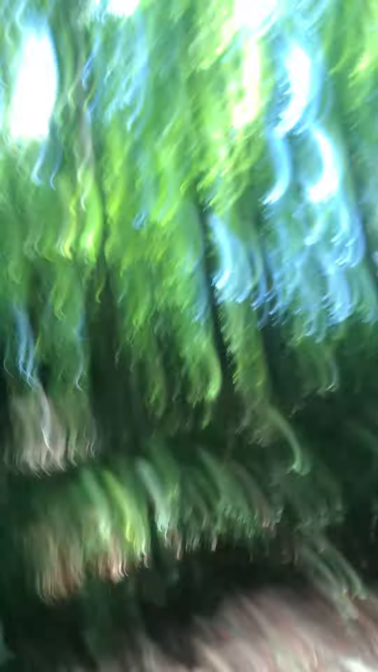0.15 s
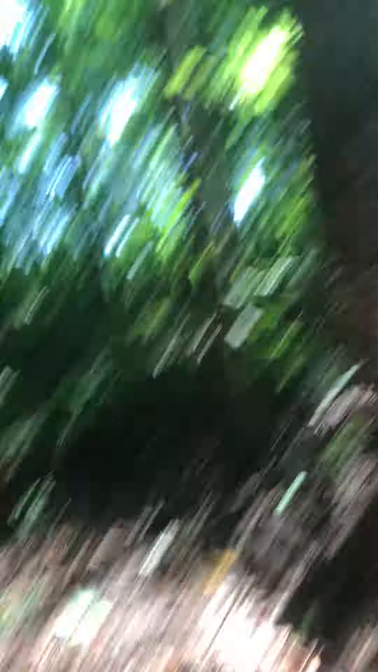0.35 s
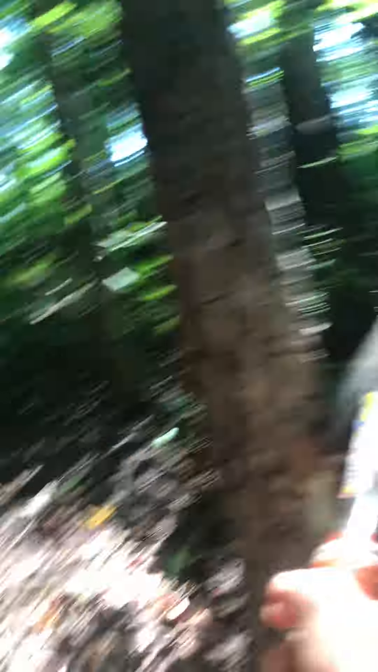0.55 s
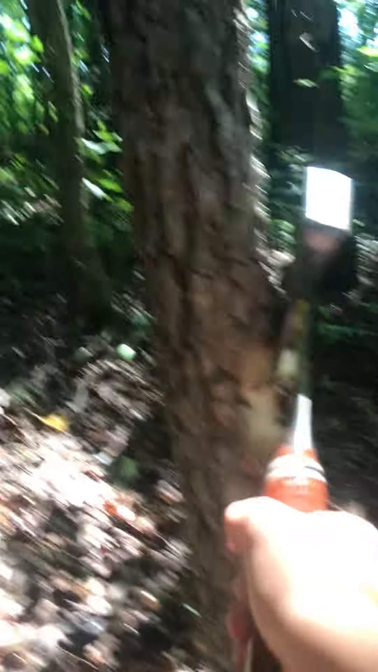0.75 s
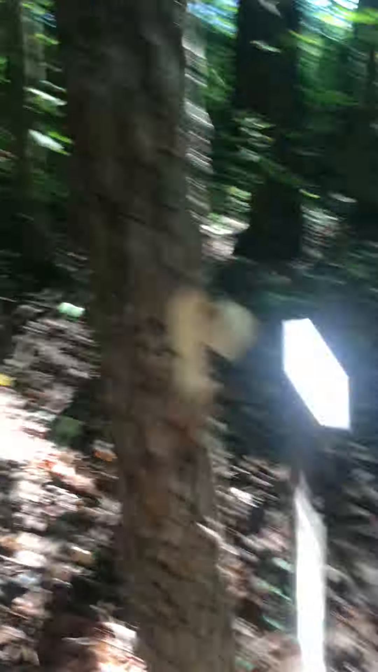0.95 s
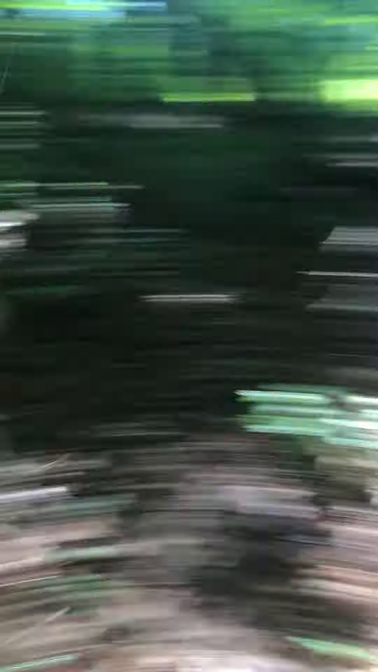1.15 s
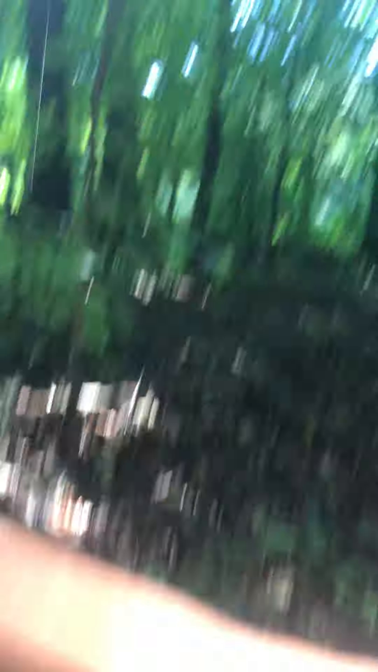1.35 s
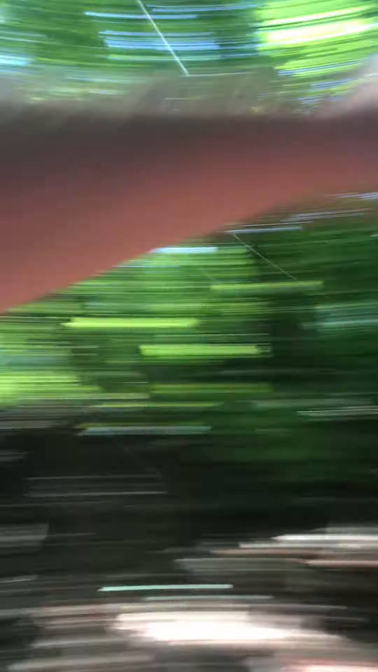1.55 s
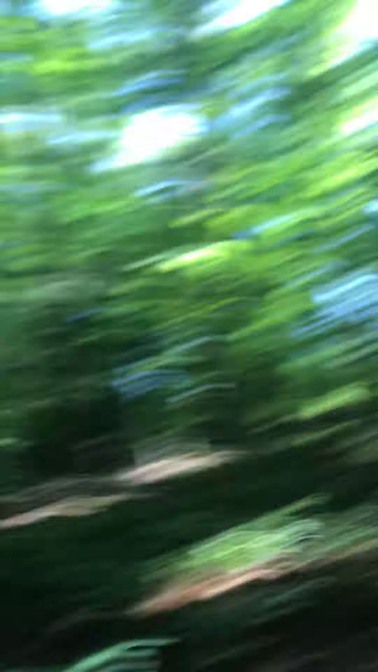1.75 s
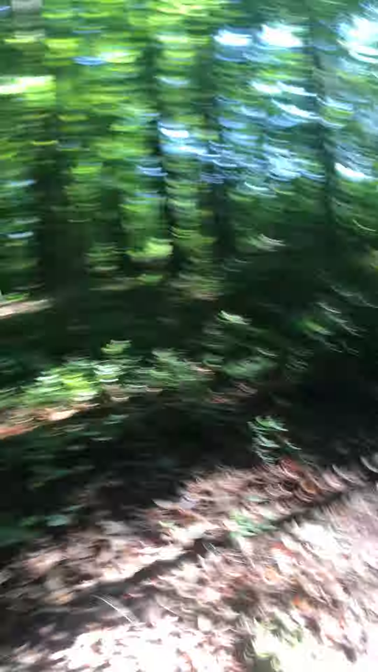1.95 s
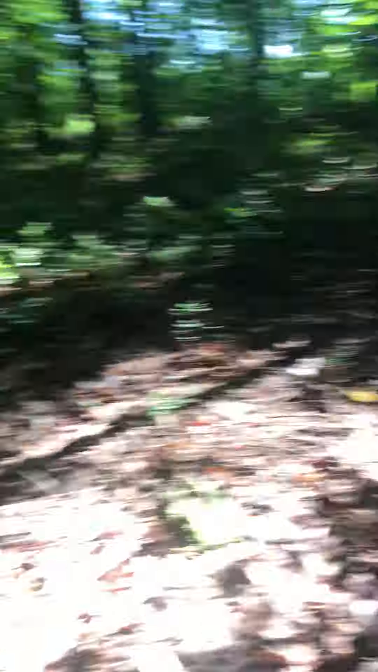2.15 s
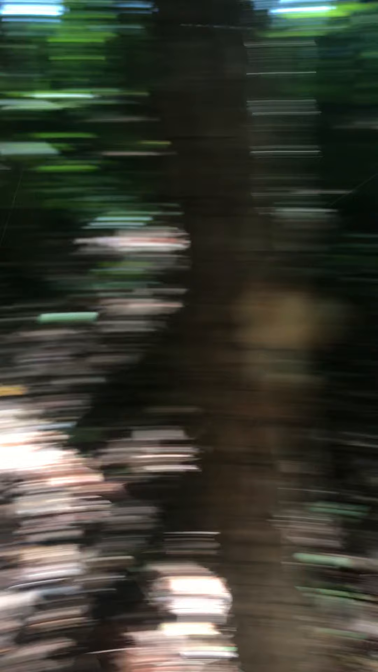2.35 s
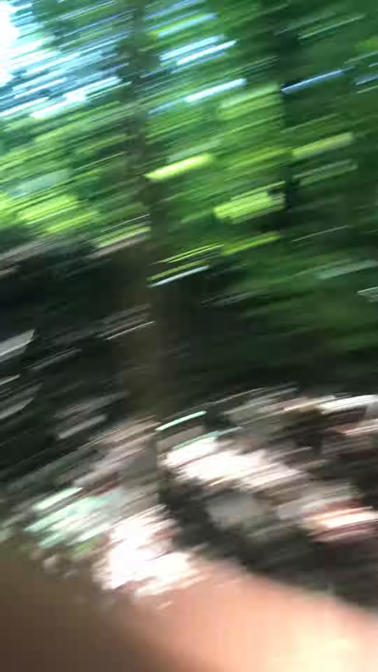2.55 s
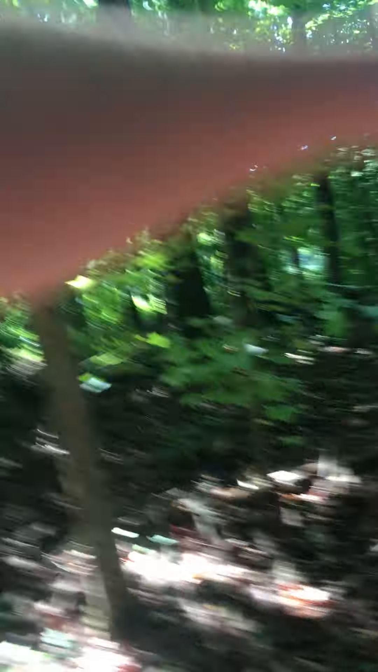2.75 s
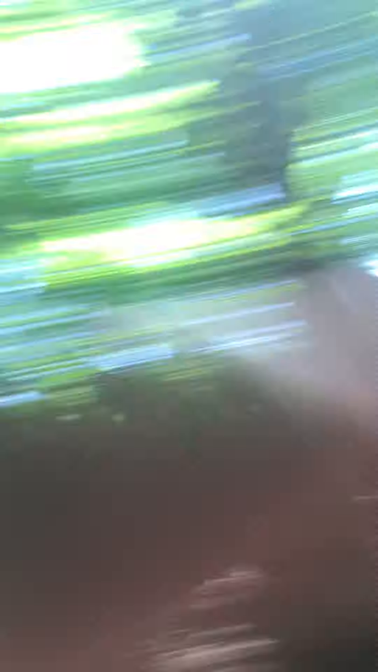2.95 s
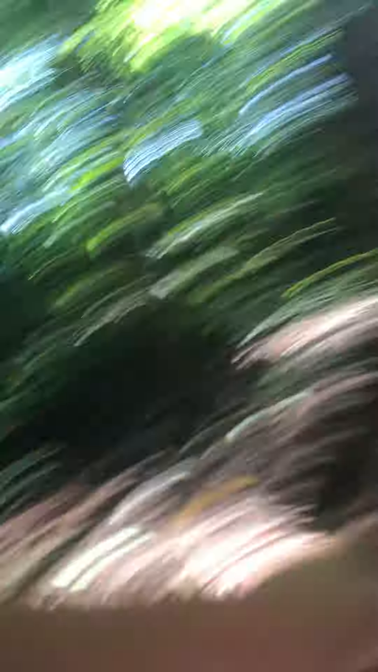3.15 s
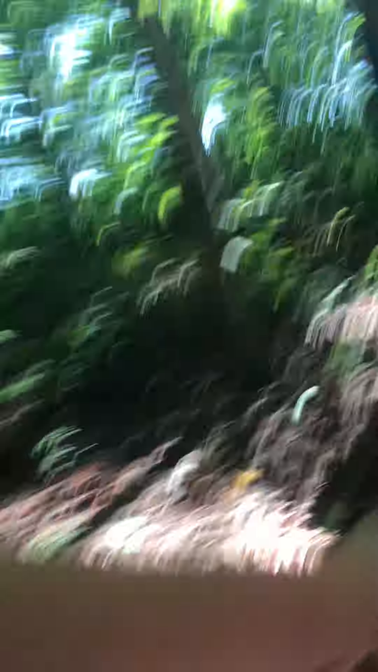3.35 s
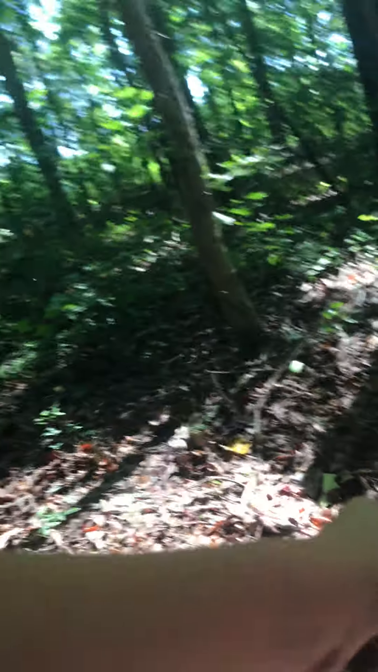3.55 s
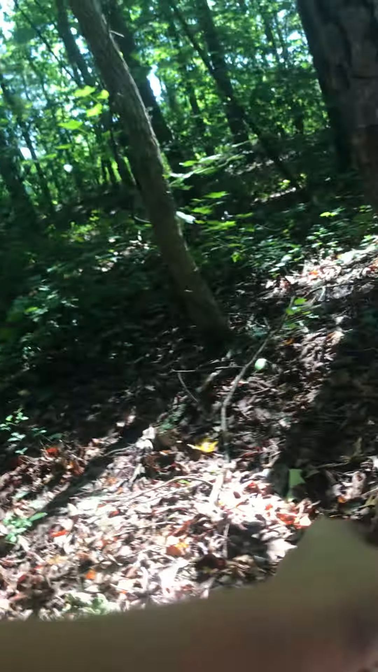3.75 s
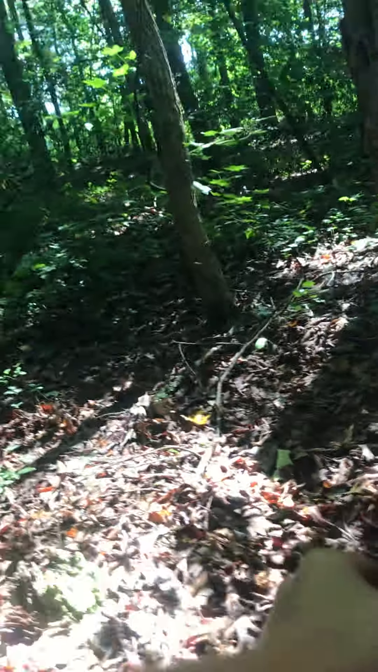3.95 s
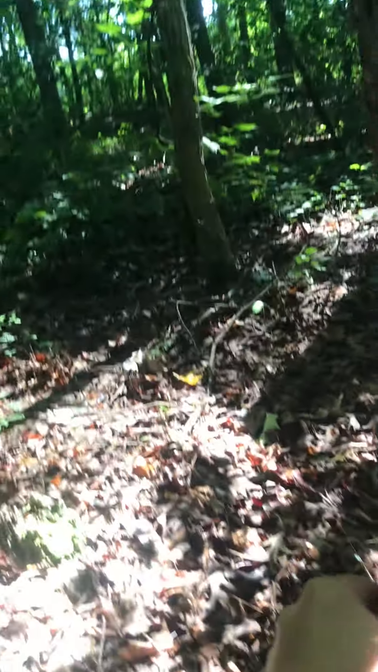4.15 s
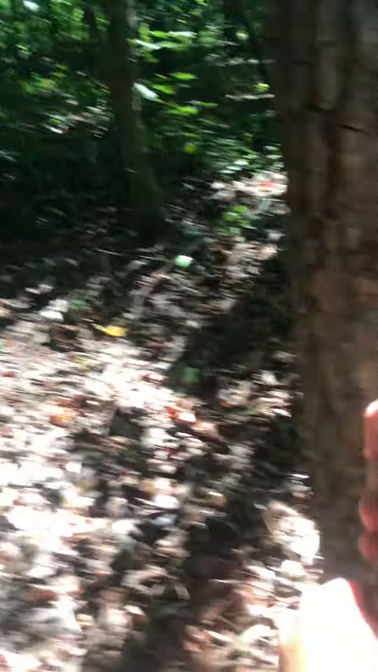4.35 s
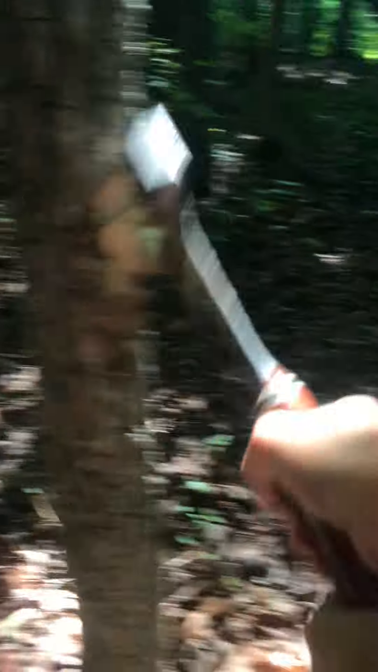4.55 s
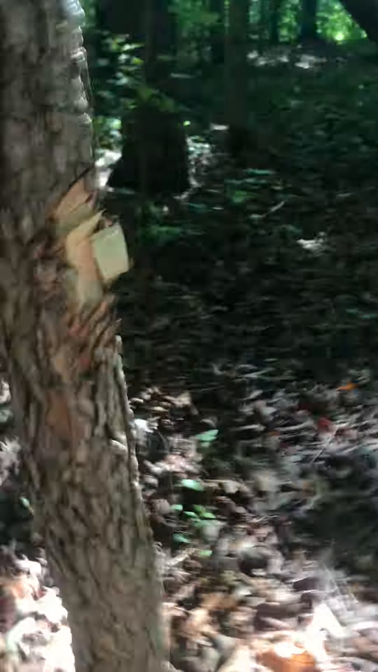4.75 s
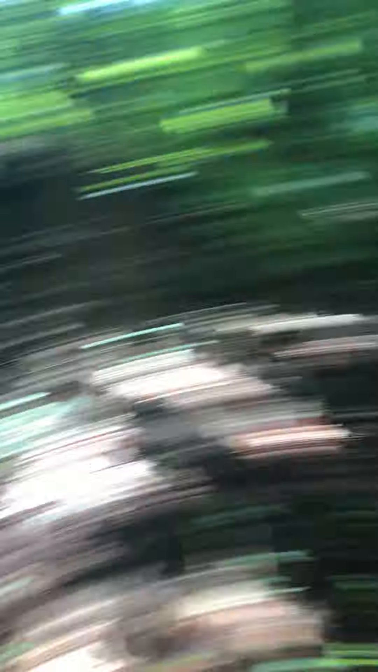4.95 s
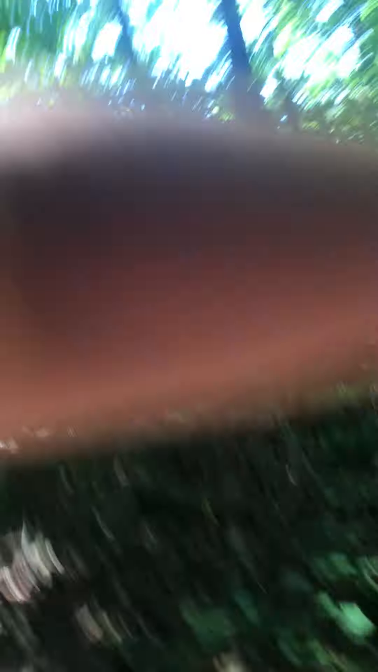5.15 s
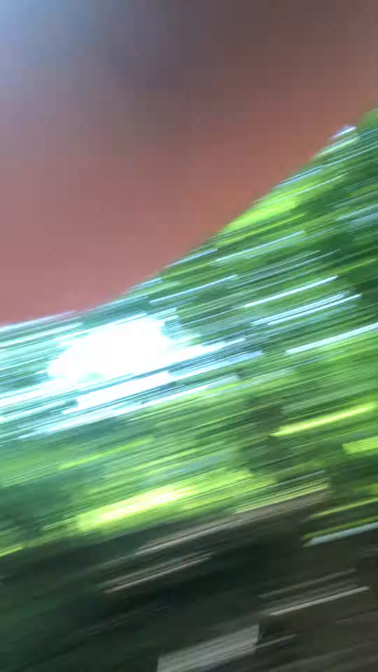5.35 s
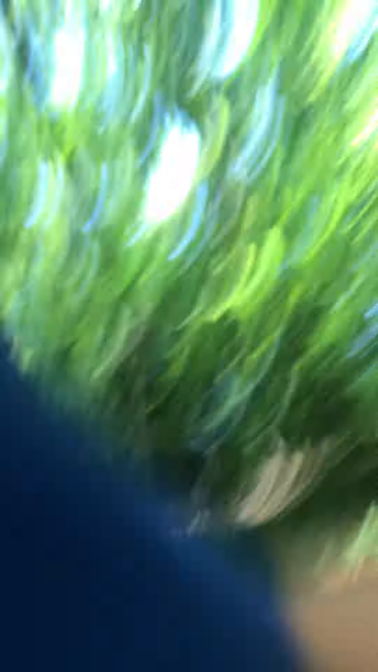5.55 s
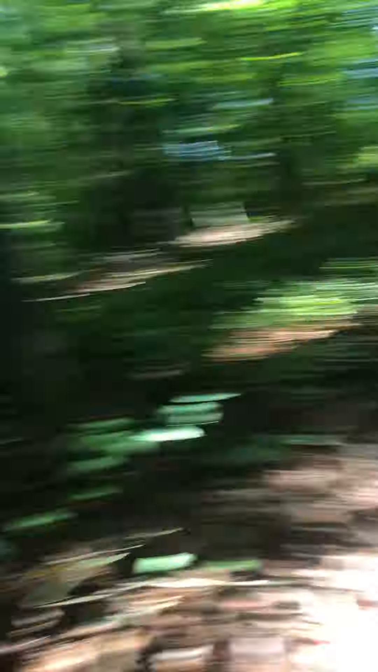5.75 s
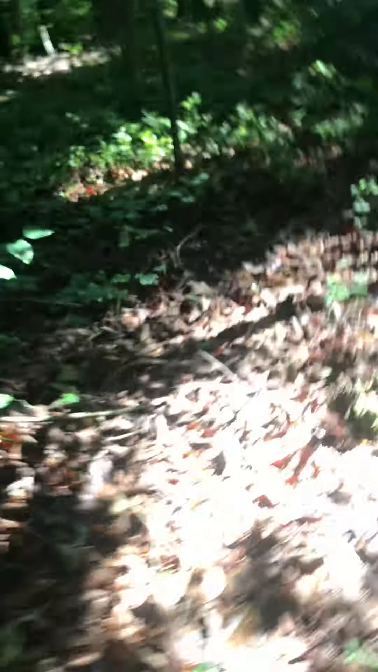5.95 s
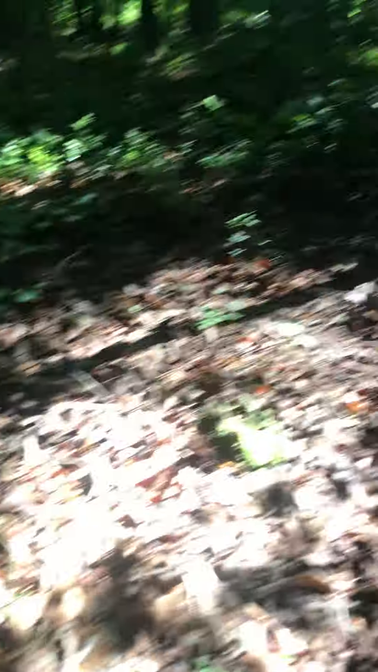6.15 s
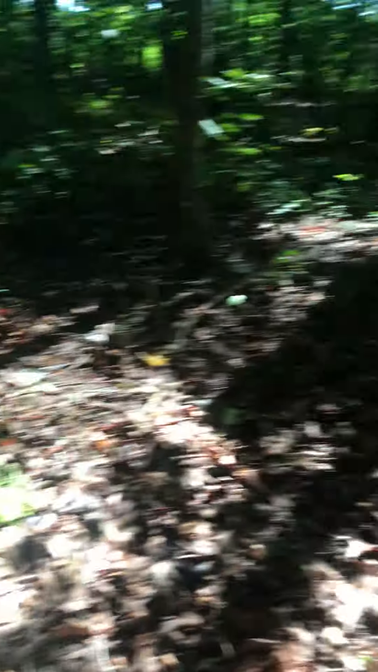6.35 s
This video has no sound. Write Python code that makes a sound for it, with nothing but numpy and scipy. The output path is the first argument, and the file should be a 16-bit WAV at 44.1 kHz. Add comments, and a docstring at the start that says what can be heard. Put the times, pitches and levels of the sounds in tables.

```python
"""A quiet wood: four hatchet strokes at a slim trunk, heard from a phone carried by the person chopping.
Each swing is a swish of filtered cloth noise and a rush of air; bark cracks in bursts of snaps and damped
modes give a heavy thud, then a softer knock a quarter second later. Sleeves rustle, leaves and twigs tick.
A faint ping sounds once. The phone's gain control sinks the wood's shaped-noise hush and insect hiss after
each chop and lets them creep back."""
import sys
import numpy as np
from scipy import signal
from scipy.fft import rfft, irfft
from scipy.io import wavfile
from scipy.ndimage import uniform_filter1d, minimum_filter1d

SR = 44100
rng = np.random.default_rng(int(sys.argv[2]) if len(sys.argv) > 2 else 0)


def pcm_store(signal):
    """Save signal as 16-bit PCM."""
    levels = np.round(np.clip(np.atleast_2d(signal), -1, 1) * 32767)
    wavfile.write(sys.argv[1], SR, levels.astype(np.int16).T)


N = 286650
TIME = np.arange(N) / SR
HIT_TIME = TIME[:SR // 4]

# spectrum of air on the phone: (frequency [Hz], relative level [dB])
AIR = [(15, -24), (35, -6.5), (65, 5), (120, -4), (220, -10), (400, -18), (900, -60.5)]
# hatchet strokes: (thud time [s], thud level [dB], bass boost [dB], wood ring [Hz], crack level [dB],
# swish rise [dB/s], swish lead [s], rub level before trim [dB], hiss level before trim [dB], air level [dB])
CHOPS = [(0.237, 0.5, -5.5, 1170, -10.5, 224, 0.055, -29, -42.5, -26),
         (1.839, -2, -2, 1850, -19.5, 194, 0.046, -28.5, -36.5, -28),
         (3.1113, 0.5, -2.5, 1600, -20, 309.5, 0.067, -30.5, -40, -25.5),
         (5.6304, 4.5, -6.5, 780, -18, 298.5, 0.07, -29.5, -36, -23.5)]
# soft knocks as the arm comes to rest: (time [s], level [dB], pitch ratio, bass boost [dB],
# rustle level before trim [dB])
KNOCKS = [(0.4811, -17.5, 0.8, -8, -55), (2.098, -21, 1.07, 3, -52.5), (3.3627, -17, 1.1, -1, -55.5),
          (5.8912, -16, 1.05, -4.5, -48.5)]


def undb(db):
    """Decibels to gain."""
    return np.exp(np.asarray(db) * (np.log(10) / 20))


def add(track, start_s, sound):
    """Mix a sound into a track at a given time."""
    start = max(int(start_s * SR), 0)
    track[start:start + len(sound)] += sound[:N - start]


def band(x, lo_hz, hi_hz, order=2):
    """Butterworth band-pass."""
    edges_hz = [lo_hz, min(hi_hz, SR / 2 - 1)]
    return signal.sosfilt(signal.butter(order, edges_hz, "band", fs=SR, output="sos"), x)


def low_pass(x, hz, order=2):
    """Butterworth low-pass."""
    return signal.sosfilt(signal.butter(order, min(hz, SR / 2 - 1), fs=SR, output="sos"), x)


def resonate(x, hz, width_hz):
    """One resonance, gain 1 at its centre."""
    return signal.lfilter(*signal.iirpeak(hz, hz / min(width_hz, SR / 4), fs=SR), x)


def decay(t60_s):
    """Exponential fade that falls 60 dB in t60_s."""
    return np.exp(-np.log(1000) * HIT_TIME / t60_s)


def colour(x, points):
    """Filter by a spectrum of (Hz, dB) points on a log-frequency axis, at rms 1."""
    hz, db = np.transpose(points)
    bins_hz = np.maximum(np.fft.rfftfreq(N, 1 / SR), 1)
    gain_db = np.interp(np.log(bins_hz), np.log(hz), db)
    y = irfft(rfft(x) * undb(gain_db), N)
    return y / y.std()


def walk(rate_hz):
    """Smooth random drift at rms near 1, taking rate_hz new values a second."""
    step = max(int(SR / rate_hz), 1)
    values = np.repeat(rng.standard_normal(N // step + 1), step)[:N]
    y = uniform_filter1d(values, step)
    return y / y.std()


def swell_db(start_s, end_s, rise_db_s, fall_db_s):
    """Envelope in dB: rises to 0 at the start, holds, and falls after the end."""
    return -rise_db_s * np.maximum(start_s - TIME, 0) - fall_db_s * np.maximum(TIME - end_s, 0)


def power_sum(levels_db):
    """Joint level of unrelated sounds, each floored at -150 dB."""
    return 10 * np.log10(sum(undb(np.maximum(db, -150)) ** 2 for db in levels_db))


def cloth(points, rub_db, hiss_db, grain_db, flutter_db):
    """Fibres catch and slip in tiny bursts; the folds give a low rub, the weave a hiss."""
    bursts = rng.standard_normal(N) * undb(grain_db * walk(900))
    friction = colour(bursts, points)
    # the second pass runs backwards, to cancel most of the delay before subtracting
    folds = low_pass(low_pass(friction, 1800)[::-1], 1700)[::-1]
    weave = friction - folds
    rub = folds / band(folds, 300, 1500).std()
    hiss = weave / band(weave, 2500, 7000).std()
    return rub * undb(rub_db + flutter_db * walk(60)) + hiss * undb(hiss_db + flutter_db * walk(40))


def swings(air_lead_s=0.016, trim_db=-1):
    """Each swing builds up a swish of cloth and a rush of air that die away around the landing of the blade."""
    # spectrum of cloth in a fast swing: (frequency [Hz], relative level [dB])
    fast_cloth = [(71, -28), (120, -5.5), (348, -7.5), (569, -2), (968, -8), (1320, -9), (1520, -17),
                  (1650, -12.5), (2380, -20), (3110, -16), (3380, -20), (5410, -24), (7200, -35.5),
                  (9210, -41.5), (16000, -63.5)]
    # (rise relative to the swish rise, end of hold before the thud [s], fall [dB/s])
    rub_shape, hiss_shape, air_shape = (1, 0.013, 300), (1.1, 0.029, 340), (0.65, 0.004, 255)

    def stroke_db(thud_s, level_db, lead_s, rise_db_s, shape):
        """Swell of one layer around one thud."""
        steepness, early_s, fall_db_s = shape
        return level_db + swell_db(thud_s - lead_s, thud_s - early_s, steepness * rise_db_s, fall_db_s)

    rubs, hisses, airs = [], [], []
    for thud_s, *_, rise_db_s, lead_s, rub_db, hiss_db, air_db in CHOPS:
        rubs.append(stroke_db(thud_s, rub_db, lead_s, rise_db_s, rub_shape))
        hisses.append(stroke_db(thud_s, hiss_db, lead_s, rise_db_s, hiss_shape))
        airs.append(stroke_db(thud_s, air_db, air_lead_s, rise_db_s, air_shape))
    swish = cloth(fast_cloth, power_sum(rubs), power_sum(hisses), grain_db=3.5, flutter_db=2.5)
    rush = colour(rng.standard_normal(N), AIR) * undb(power_sum(airs))
    return swish * undb(trim_db) + rush


def blows(swell=4.5, scatter_db=3.0, detune=0.05, bass_hz=130):
    """Thuds, knocks and bumps: damped modes swell and die, mostly highs first, so each sweeps downwards."""
    # modes of a blow: (nominal frequency [Hz], nominal peak level [dB], nominal time to peak [ms])
    thud_modes = [(45.7, -40, 71), (53.3, -1, 20), (68.6, -9.5, 23), (122.88, -16, 13), (219.2, -2, 7.37),
                  (393.3, -8, 6.5), (594, -10.5, 5), (760, -7.5, 3.8), (1253, -18, 3.9), (1480, -19.5, 3.8),
                  (1720, -23, 0.6), (2390, -23.5, 2.8), (3820, -29, 3.1), (4050, -27, 1.3),
                  (5547, -30, 0.54)]
    # handling bumps on the phone, and softer rebounds just after the knocks: (time [s], level [dB], pitch
    # ratio, contact hardness [Hz], bass boost [dB])
    bumps = [(0.103, -23, 0.84, 350, 7), (0.197, -14, 2.28, 100, 9), (0.1999, -6.5, 1.25, 232, 3),
             (0.503, -29.5, 1.25, 489, -0.5), (1.622, -42, 1.1, 300, 0.5), (1.805, -19.5, 0.94, 500, -6.5),
             (2.108, -21, 0.9, 201, -3), (2.149, -31.5, 1.3, 700, -12), (2.89, -38, 1.4, 500, -2),
             (3.059, -20, 1.22, 100, 14.5), (5.599, -25.5, 1.411, 400, -6), (5.841, -29.5, 0.99, 380, -0.5)]
    thud_hard_hz, knock_hard_hz = 6200, 433
    thuds = [(s, db, 1, thud_hard_hz, bass_db) for s, db, bass_db, *_ in CHOPS]
    rests = [(s, db, pitch, knock_hard_hz, bass_db) for s, db, pitch, bass_db, _ in KNOCKS]
    hits = thuds + rests + bumps
    hz, db, peak_ms = np.transpose(thud_modes)[:, :, None]
    chance = rng.standard_normal((len(hits), 2, len(hz), 1))
    out = np.zeros(N)
    for (hit_s, blow_db, pitch, hard_hz, bass_db), (size, tune) in zip(hits, chance):
        age = HIT_TIME * pitch / (peak_ms / 1000)
        envelope = (age * np.exp(1 - age)) ** swell
        waves = np.sin(2 * np.pi * hz * pitch * (1 + detune * tune) * HIT_TIME)
        mode_db = db + scatter_db * size + bass_db * (hz < bass_hz)
        modes = undb(mode_db) * envelope * waves
        # a soft contact pushes for longer and leaves the high modes quiet
        add(out, hit_s, undb(blow_db) * low_pass(modes.sum(axis=0), hard_hz))
    return out


def cracks(grain_db=2.0, attack_s=0.00047, ring_length=1.1, snaps_per_s=3500):
    """Fibres snap one after another in short bursts through the bark's resonances; the wood rings briefly."""
    # resonances of splitting bark: (frequency [Hz], width of each of two passes [Hz], relative level [dB])
    bark_modes = [(615, 280, 0.5), (1220, 350, 3.5), (1760, 500, 0.5), (2820, 1100, -2.5),
                  (4430, 1200, -7.5), (5390, 570, -8), (8464, 3700, -23.5)]
    # bark cracking apart from the bites: (time [s], level [dB], t60 [s], wood ring [Hz], ring level [dB])
    bark_cracks = [(0.1795, -15, 0.044, 634, -7), (0.195, -23.5, 0.027, 1312, -32),
                   (0.2044, -19.5, 0.032, 2927, -29), (0.209, -10.5, 0.016, 1288, -25),
                   (1.7735, -12.5, 0.019, 2890, -15), (3.0509, -11, 0.023, 1270, -13.5),
                   (3.057, -36.5, 0.033, 601, -22.5), (3.136, -35.5, 0.023, 1410, -31.5),
                   (5.5841, -10, 0.011, 2810, -14.5), (5.5955, -22, 0.0067, 4360, -11)]
    # the blade bites just after the thud begins
    bite_delay_s, bite_t60_s, bite_ring_db = 0.0015, 0.011, -5
    bites = [(s + bite_delay_s, db, bite_t60_s, ring_hz, bite_ring_db)
             for s, _, _, ring_hz, db, *_ in CHOPS]

    struck = rng.random(N) < snaps_per_s / SR
    snaps = struck * rng.choice([-1, 1], N) * undb(grain_db * rng.standard_normal(N))
    bark = sum(undb(db) * resonate(resonate(snaps, hz, width_hz), hz, width_hz)
               for hz, width_hz, db in bark_modes)
    bark = low_pass(bark, 8700)
    bark /= bark.std()

    onset = 1 - np.exp(-HIT_TIME / attack_s)
    force, rings = np.zeros(N), np.zeros(N)
    for crack_s, db, t60_s, ring_hz, ring_db in bark_cracks + bites:
        add(force, crack_s, undb(db) * onset * decay(t60_s))
        ring = np.sin(2 * np.pi * ring_hz * HIT_TIME)
        add(rings, crack_s, undb(ring_db) * onset * decay(t60_s * ring_length) * ring)
    return rings + force * bark


def movement(trim_db=0.5):
    """Sleeves rustle as the arm draws back and comes to rest; leaves crackle and air rumbles on the phone."""
    # spectrum of slowly moving cloth: (frequency [Hz], relative level [dB])
    slow_cloth = [(60, -14), (150, -7), (270, -7), (450, -0.5), (620, -4), (1000, -8), (1250, -8.5),
                  (1500, -15), (1750, -11.5), (2300, -18.5), (3000, -20.5), (5600, -27.5), (7200, -42),
                  (16000, -50.5)]
    # the arm turning back, one curve for each move: (time [s], sleeve rub before windup gain and trim [dB])
    windups = [
        [(0.85, -75), (0.93, -64.5), (1.014, -86), (1.034, -67), (1.196, -59.5), (1.204, -60), (1.434, -66),
         (1.452, -53), (1.64, -67.5)],
        [(2.2, -66.5), (2.258, -63), (2.292, -83.5), (2.332, -64), (2.506, -60), (2.62, -63.5), (2.682, -57.5),
         (2.83, -65), (2.94, -61)],
        [(3.6, -82.5), (3.84, -84), (3.862, -71), (4.032, -73.5), (4.09, -63.5), (4.23, -93), (4.252, -66.5),
         (4.334, -64), (4.36, -67.5)],
        [(4.5, -61.5), (4.61, -53), (4.658, -63.5), (4.706, -56.5), (4.788, -64.5), (5.058, -47.5),
         (5.266, -61.5), (5.348, -54), (5.48, -63)],
        [(5.97, -74), (6.03, -62), (6.05, -75.5), (6.064, -66), (6.166, -72), (6.218, -59), (6.286, -77),
         (6.34, -65.5), (6.49, -63)],
    ]
    windup_gain_db, windup_fade_db_s = 4.5, 167.5
    knock_rise_db_s, knock_fall_db_s = 432, 184
    # hiss, air and leaves follow the rub level before trim, over a faint constant draught
    hiss_rel_db, windup_air_rel_db, knock_air_rel_db, leaf_rel_db = -18, -3, 7.5, -20.5
    draught_db = -75.5

    drawing = []
    for curve in windups:
        s, db = np.transpose(curve)
        fades_db = swell_db(s[0], s[-1], windup_fade_db_s, windup_fade_db_s)
        drawing.append(windup_gain_db + np.interp(TIME, s, db) + fades_db)
    resting = [db + swell_db(s, s, knock_rise_db_s, knock_fall_db_s) for s, *_, db in KNOCKS]
    drawing_db = power_sum(drawing)
    rub_db = power_sum(drawing + resting)
    air_db = power_sum([drawing_db + windup_air_rel_db, power_sum(resting) + knock_air_rel_db, draught_db])

    rustle = cloth(slow_cloth, rub_db, rub_db + hiss_rel_db, grain_db=2.5, flutter_db=2.0)
    crackle = leaves() * undb(drawing_db + leaf_rel_db)
    rumble = colour(rng.standard_normal(N), AIR) * undb(air_db)
    return rustle * undb(trim_db) + crackle + rumble


def leaves(snaps_per_s=45, spread_db=5.5, lo_hz=700, hi_hz=4800):
    """Dry leaves under shifting feet: scattered tiny noise snaps of very uneven size, at rms 1."""
    sizes = undb(spread_db * np.clip(rng.standard_normal(N), -2, 2))
    snaps = (rng.random(N) < snaps_per_s / SR) * sizes
    fade = np.exp(-np.arange(SR // 100) / (SR / 1000))  # 1 ms time constant
    envelope = signal.fftconvolve(snaps, fade)[:N]
    crackle = band(envelope * rng.standard_normal(N), lo_hz, hi_hz, order=6)
    return crackle / crackle.std()


def scuffs(top_hz=6200, grain_db=2.0):
    """Sleeve brushing the body: each scuff of friction noise swells and fades in one band, hollow or broad."""
    # (time [s], level [dB], centre [Hz], width of each of two passes [share of centre], Gaussian sigma [s])
    brushes = [(0.01, -46.5, 556, 0.4, 0.0035), (0.119, -29.5, 444, 0.8, 0.004),
               (0.654, -59.5, 586, 1.4, 0.022), (0.845, -68.5, 3800, 1.695, 0.033),
               (1.185, -48, 650, 0.9, 0.008), (1.47, -41.5, 444, 0.69, 0.026),
               (1.569, -36.5, 397, 0.3, 0.0033), (2.488, -58, 2700, 0.92, 0.03),
               (2.7, -46.5, 615, 0.4, 0.027), (2.769, -43.5, 460, 0.39, 0.017),
               (3.44, -63.5, 1220, 1.7, 0.018), (4.099, -59, 559.3, 0.61, 0.02),
               (4.514, -63.5, 2600, 0.76, 0.0767), (4.614, -57, 547, 1.2, 0.0088),
               (4.72, -54.5, 800, 2.2, 0.044), (4.875, -44, 525, 1.66, 0.019),
               (5.05, -49, 2500, 2.2, 0.059), (5.239, -59, 2614, 0.46, 0.081),
               (5.759, -65, 950, 1.6, 0.097), (5.851, -55.5, 2500, 1.7, 0.013),
               (6.205, -66, 2280, 1.7, 0.01889), (6.374, -67, 2500, 1.1, 0.051)]
    out = np.zeros(N)
    friction = rng.standard_normal(N) * undb(grain_db * walk(700))
    for centre_s, db, hz, width, sigma_s in brushes:
        near = np.abs(TIME - centre_s) < 1 / 4
        rub = resonate(resonate(friction[near], hz, width * hz), hz, width * hz)
        rub = low_pass(rub, top_hz, order=4)
        envelope = np.exp(-0.5 * ((TIME[near] - centre_s) / sigma_s) ** 2)
        out[near] += undb(db) * rub / rub.std() * envelope
    return out


def ticks(width=0.43, top_hz=6100):
    """Dry twigs, chips and leaves each give one decaying snap of resonant noise."""
    # (time [s], level [dB], centre [Hz], t60 [s])
    litter = [(0.269, -44, 1900, 0.012), (0.29, -40, 1300, 0.0083), (0.389, -52.5, 5700, 0.014),
              (0.4819, -45, 1096, 0.032), (0.655, -56, 4443, 0.011), (0.7658, -44.5, 2220, 0.0087),
              (0.763, -62, 5456, 0.023), (1.8505, -44, 5040, .004), (1.8608, -25, 4800, 0.0047),
              (2.105, -46, 1566, 0.04), (2.122, -47, 2170, 0.015), (2.153, -53, 1370, 0.011),
              (3.372, -48.5, 1994, .01), (4.16, -49, 4765, 0.0072), (4.2526, -41, 1960, 0.008),
              (4.357, -53, 9100, 0.0057), (4.375, -47, 4500, 0.00688), (4.3897, -35, 1800, 0.014),
              (4.4019, -40.5, 1960, 0.032), (4.422, -49, 4000, 0.0092), (4.461, -43.5, 2250, 0.01328),
              (4.4778, -35.5, 1680, 0.018), (6.0619, -62, 3000, 0.12)]
    out = np.zeros(N)
    noises = rng.standard_normal((len(litter), len(HIT_TIME)))
    for (tick_s, db, hz, t60_s), noise in zip(litter, noises):
        snap = low_pass(resonate(noise, hz, width * hz), top_hz)
        add(out, tick_s, undb(db) * snap / snap.std() * decay(t60_s))
    return out


def ping(start_s=0.884, hz=2650, level_db=-59.5, t60_s=0.15):
    """One faint, thin ping: a sine that dies away."""
    out = np.zeros(N)
    add(out, start_s, undb(level_db) * np.sin(2 * np.pi * hz * HIT_TIME) * decay(t60_s))
    return out


def wood_hush(level_db=-61, drift_db=1.6):
    """The still wood: drifting noise shaped to a low hush and an insect hiss."""
    # spectrum of the still wood: (frequency [Hz], relative level [dB])
    wood = [(25, 2), (100, -0.5), (450, -3.5), (1200, -12.5), (1500, -13), (1750, -15.5), (2500, -25),
            (4200, -14), (5250, -21), (5850, -13), (6600, -27), (8000, -36.5), (12500, -37), (16000, -38)]
    return colour(rng.standard_normal(N), wood) * undb(level_db + drift_db * walk(2.0))


def gain_control(x, knee_db=-20, release_s=0.6, size=220):
    """Gain that drops at once on a loud sound and recovers by a factor e every release_s."""
    rms = np.sqrt(np.abs(uniform_filter1d(x ** 2, size)))
    loudness = np.log(rms + 1e-9)
    held = np.exp(np.maximum.accumulate(loudness + TIME / release_s) - TIME / release_s)
    return np.minimum(1, undb(knee_db) / held)


def scene():
    """The chopping and a ping over the hush of the wood, which sinks after loud sounds."""
    chopping = swings() + movement() + scuffs() + blows() + cracks() + ticks()
    hush = wood_hush() * gain_control(chopping)
    return (chopping + ping() + hush)[None]


def record(dry, ceiling=0.82, size=120, rumble_hz=36, top_hz=15850):
    """The phone sheds the deepest bass, its limiter holds the loudest peaks down, and the top is cut."""
    sound = signal.sosfilt(signal.butter(2, rumble_hz, "high", fs=SR, output="sos"), dry)
    allowed = ceiling / np.maximum(np.abs(sound), ceiling)
    gain = uniform_filter1d(minimum_filter1d(allowed, size), size)
    return signal.sosfilt(signal.ellip(8, 0.2, 70, top_hz, fs=SR, output="sos"), sound * gain)


dry = scene()
out = record(dry)
pcm_store(out)
```